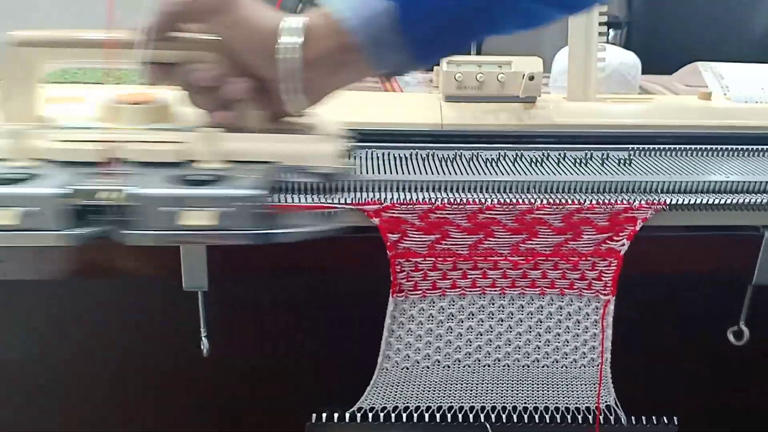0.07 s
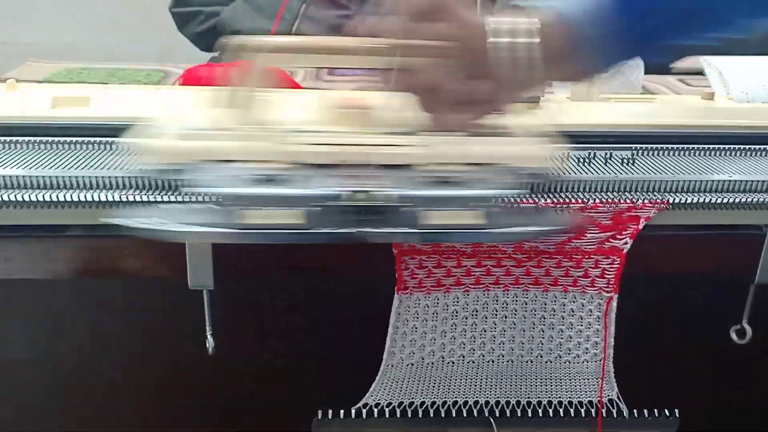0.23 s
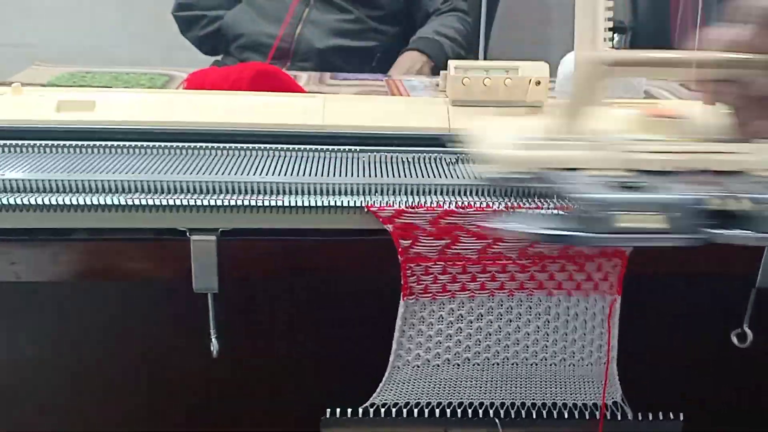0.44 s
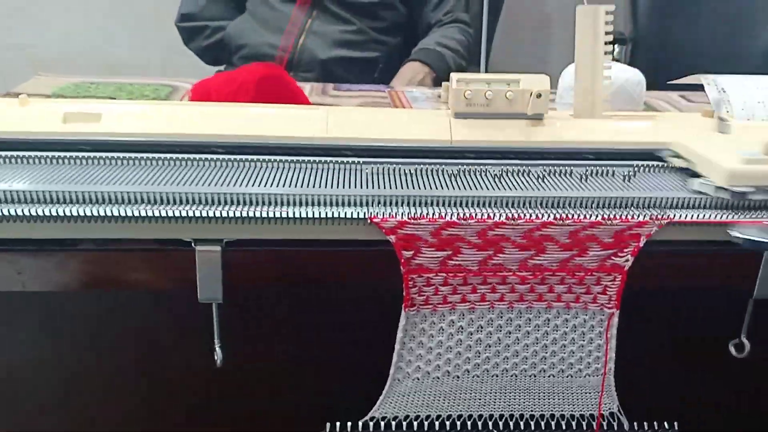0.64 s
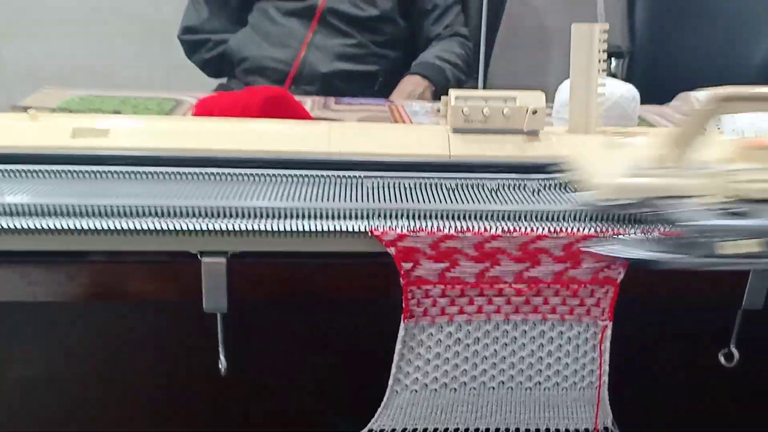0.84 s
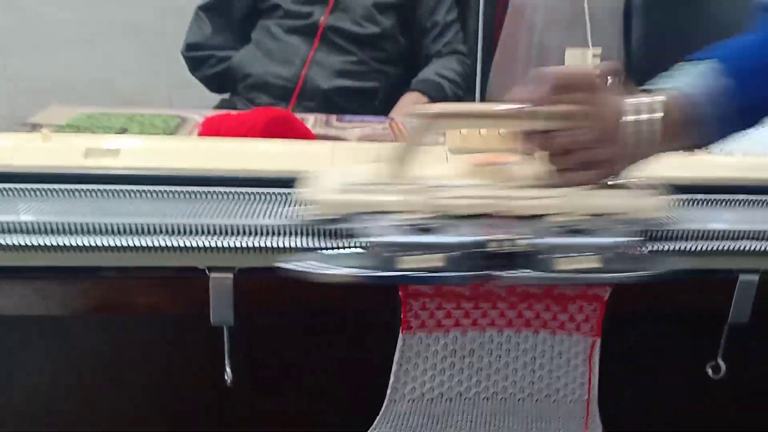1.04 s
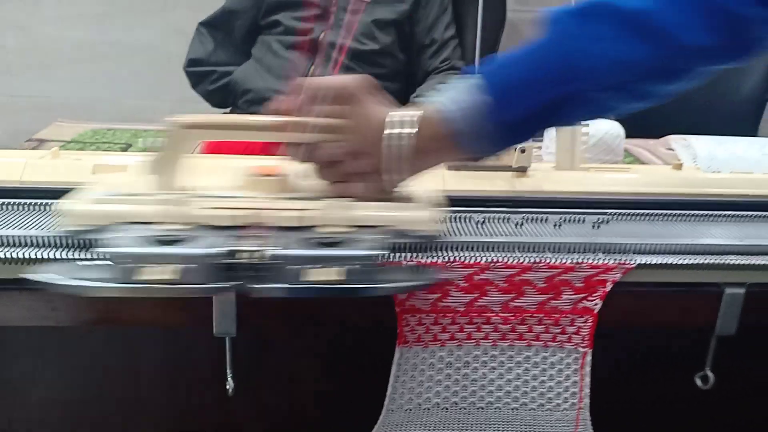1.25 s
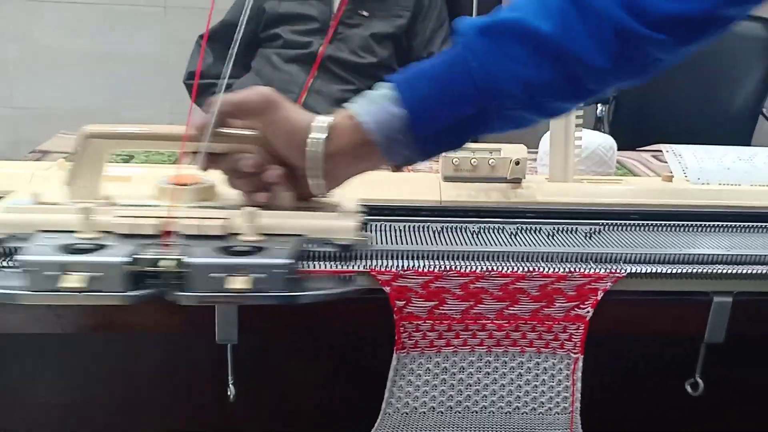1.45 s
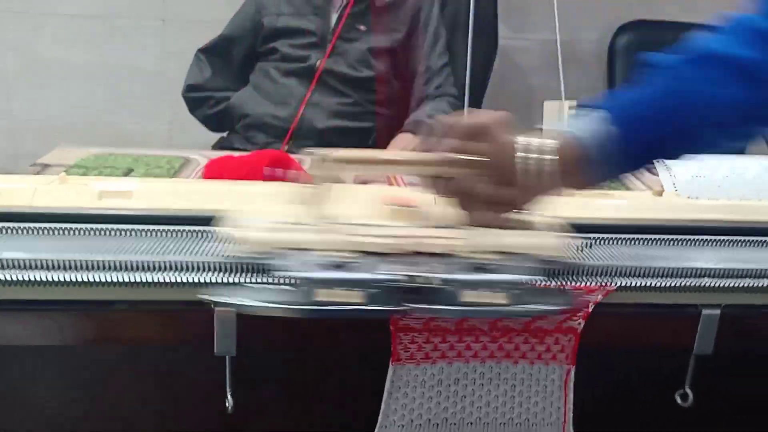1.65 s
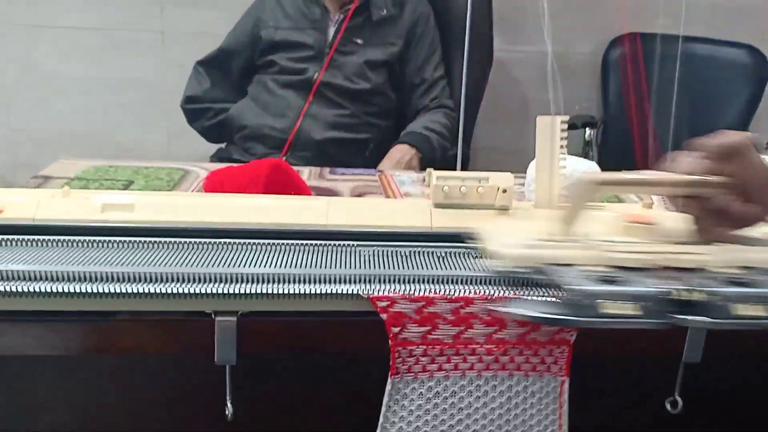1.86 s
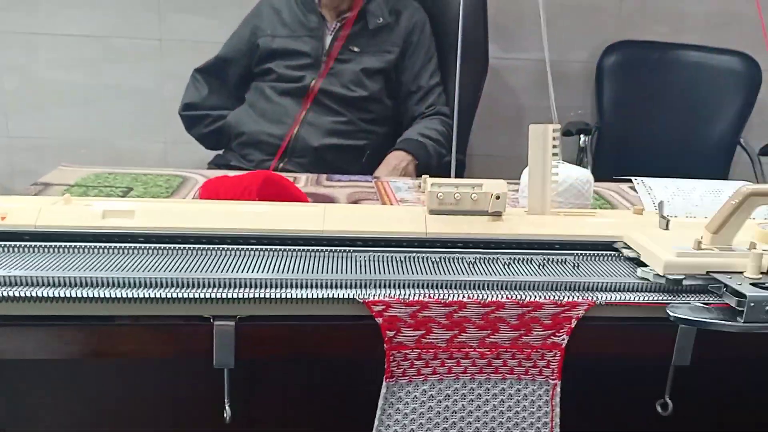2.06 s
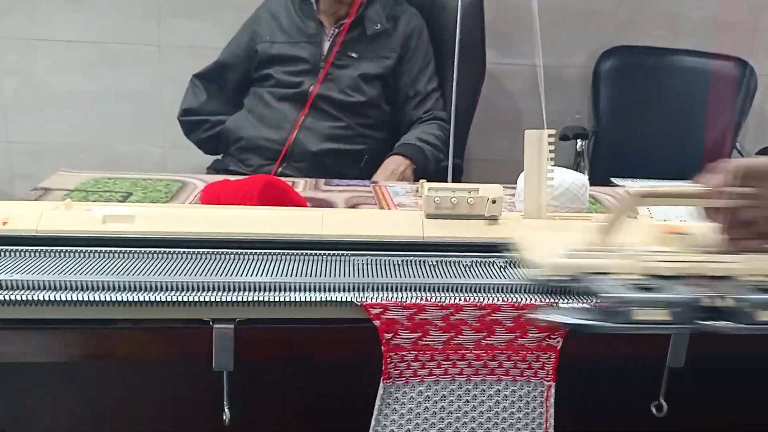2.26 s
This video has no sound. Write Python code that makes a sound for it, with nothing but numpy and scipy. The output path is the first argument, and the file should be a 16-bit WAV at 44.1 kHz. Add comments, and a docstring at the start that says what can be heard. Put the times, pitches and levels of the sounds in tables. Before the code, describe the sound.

Close by in a small room, a hand knitting machine carriage sweeps three times over its needles. Rapid metallic clicks merge into a droning rasp that rises and falls, with scattered knocks and a brief lull at each turn.

```python
"""The carriage of a hand knitting machine is pushed right, left and right again over its steel needle bed.
Its cams strike hundreds of needles a second: a train of impacts that grows denser and brighter with speed.
The impacts force the plastic shell to drone and the long bed to boom under the rasp. The carriage knocks
as it takes up each stroke, and loose steel parts clink. A small hard room with a low rumble surrounds it."""
import sys
import numpy as np
from scipy import signal
from scipy.fft import rfft, irfft, next_fast_len
from scipy.io import wavfile

SR = 44100
rng = np.random.default_rng(int(sys.argv[2]) if len(sys.argv) > 2 else 0)


def store_pcm(level_fs):
    """Save levels as 16-bit WAV."""
    pcm = np.round(np.clip(level_fs, -1, 1) * 32767).astype(np.int16)
    wavfile.write(sys.argv[1], SR, np.atleast_2d(pcm).T)


N = 101429


def undb(db):
    """Amplitude ratio of a level in decibels."""
    return 10 ** (np.asarray(db) / 20)


def unit(x):
    """Normalisation to unit energy in each channel."""
    return x / np.sqrt(np.sum(x ** 2, axis=-1, keepdims=True))


def along(points, hz):
    """Interpolation on a logarithmic frequency axis."""
    freqs, values = np.array(points).T
    return np.interp(np.log(hz + 1), np.log(freqs), values)


def curve(points):
    """Linear interpolation in time."""
    return np.interp(np.arange(N) / SR, *np.array(points).T)


def wander(per_s, count=400):
    """Random modulation with a spread near 1."""
    return np.interp(np.arange(N) / SR * per_s, np.arange(count), rng.standard_normal(count))


def convolve(x, response):
    """Convolution: the output of a linear system with this impulse response."""
    return signal.fftconvolve(np.atleast_2d(x), response, axes=-1)[:, :N]


def colour(points, size=2048):
    """Minimum-phase impulse response of a spectrum, by folding its cepstrum."""
    gain = undb(along(points, np.fft.rfftfreq(size, 1 / SR)))
    cepstrum = irfft(np.log(gain))
    cepstrum[1:size // 2] *= 2
    cepstrum[size // 2 + 1:] = 0
    return unit(irfft(np.exp(rfft(cepstrum)))[None])


def fade(t60, size):
    """Exponential damping: 60 dB in t60 seconds."""
    return np.exp(-np.log(1000) * np.arange(size) / SR / max(t60, 1e-3))


def ring(hz, t60, size=12000):
    """Free vibration of one damped mode."""
    return unit((np.sin(2 * np.pi * hz * np.arange(size) / SR) * fade(t60, size))[None])


# Likeness of the two channels. Each row: frequency in Hz, correlation.
COHERENCE = [(100, 1), (250, 1), (550, 0.85), (1000, 0.082), (2200, 0.089), (4500, 0.1), (14000, 0.018)]
def stereo_noise(size):
    """Spatial coherence: left and right are alike in the bass and nearly unrelated in the treble."""
    mid, side = rfft(rng.standard_normal((2, size)))
    alike = np.clip(along(COHERENCE, np.arange(len(mid)) * SR / size), -.99, .99)
    polarity = np.array([[1], [-1]])
    return irfft(mid * np.sqrt((1 + alike) / 2) + polarity * side * np.sqrt((1 - alike) / 2), size)


ROOM_T60_S, ROOM_DB = 0.25, -3
def contact(body, t60, room_db, size=16384):
    """Impulse response of one contact point: a short dense rattle in the body, then reverberation."""
    direct = unit(stereo_noise(size) * fade(t60, size))
    room = unit(stereo_noise(size) * (fade(ROOM_T60_S, size) - fade(0.0086, size)))
    return unit(convolve(direct + undb(room_db) * room, body))


def blow(body, start_s):
    """Impulse excitation: one hard contact on a body."""
    delay = int(start_s * SR)
    return np.pad(contact(body, t60=0.029, room_db=ROOM_DB), ((0, 0), (delay, N)))[:, :N]


NEEDLES_PER_S, JITTER = 320, .3  # rate at speed 1; timing spread as a share of the needle spacing
SCATTER_DB, SLIDE_DB = 3.5, -4.5
def strikes(speed, scatter_db, count=900):
    """Impact train: a cam edge meets needles at a rate proportional to speed, over sliding noise."""
    rate = NEEDLES_PER_S * speed
    travel = np.cumsum(rate) / SR
    late, strength = rng.standard_normal((count, 2)).T
    onsets = np.searchsorted(travel, np.arange(count) + rng.random() + JITTER * late)
    force = undb(scatter_db * np.clip(strength, -1.7, 1.7))
    force /= np.sqrt(np.mean(force ** 2))
    hits = np.bincount(onsets, force, N + 1)[:N] * (travel > travel[0])
    return hits * np.sqrt(SR / rate) + undb(SLIDE_DB) * rng.standard_normal(N)


def rasp(body, speed, level_db, t60, room_db, scatter_db, cams=6):
    """Incoherent summation: cam edges strike one body at separate points, and their powers add."""
    edges = (convolve(strikes(speed, scatter_db) * undb(level_db), contact(body, t60, room_db))
             for _ in range(cams))
    return sum(edges) / np.sqrt(cams)


CLICK_T60_S, STEEL_DB = 0.011, -18
# Spectrum of a needle click. Each row: frequency in Hz, relative level in dB.
STEEL_SPECTRUM = [(900, -22), (1400, -13), (1850, -3.5), (2250, 2), (2900, 1.5), (3550, -2), (4700, -1.5),
                  (5900, -3), (6500, -9.5), (8000, -20.5), (15500, -34)]
def needles(speed, effort_db):
    """Impact noise: clicks of steel merge into a rasp whose level follows the effort."""
    return rasp(colour(STEEL_SPECTRUM), speed, STEEL_DB + effort_db, CLICK_T60_S, ROOM_DB, SCATTER_DB)


LATCH_DB, LATCH_LAW = -24.5, 1.09  # the law is in dB per dB of effort
# Spectrum of a latch flick. Each row: frequency in Hz, relative level in dB.
LATCH_SPECTRUM = [(4000, -11), (6900, 5.5), (7800, 2), (9800, -1), (11500, 2.5), (12400, 0.5), (13500, 4),
                  (14500, 4), (15500, -2.5)]
def latches(speed, effort_db):
    """Power-law growth: the flicking latches gain faster than the needles, so speed adds brightness."""
    level_db = LATCH_DB + LATCH_LAW * effort_db
    return rasp(colour(LATCH_SPECTRUM), speed, level_db, CLICK_T60_S, room_db=-4, scatter_db=-2.5)


ZING_DB, ZING_LAW, FLICK_DB = -24.5, 1.064, 10.5
# Resonances of a needle. Each row: frequency in Hz, relative level in dB.
NEEDLE_RESONANCES = [(4120, -10.5), (5170, 0.5), (5480, -3)]
# Needles flicked hard. Each row: start in seconds, relative level in dB.
HARD_FLICKS = [(0.301, -2), (.318, -2), (0.382, -16), (0.449, -3.5), (0.893, -14), (0.913, -17), (1.3, -9),
               (1.675, -7), (1.936, -8)]
def zing(speed, effort_db):
    """Natural frequencies: struck needles ring at shared pitches, a few much harder than the rest."""
    out = 0
    for hz, mode_db in NEEDLE_RESONANCES:
        mode = ring(hz, t60=0.0052, size=2048)
        needle = convolve(mode, mode)
        sway_db = 2.5 * wander(per_s=31)  # each pitch comes and goes between groups of needles
        level_db = ZING_DB + ZING_LAW * effort_db + sway_db
        run = rasp(needle, speed, level_db, t60=0.0031, room_db=-11, scatter_db=6, cams=4)
        flicks = sum(undb(FLICK_DB + db) * blow(needle, start) for start, db in HARD_FLICKS)
        out = out + undb(mode_db) * (run + flicks)
    return out


NODES_PER_S, PITCH_DRIFT = 5.97, 0.014
# Modes of the shell. Each row: nominal frequency in Hz, relative level in dB, 60 dB decay in seconds.
SHELL_MODES = [(537, -1, 0.13), (604, -3.5, 0.11), (813, 5, 0.12), (1091.6, -7.5, 0.14), (1322, -9, 0.12),
               (1631, -3, 0.15), (2180, 0.5, .11)]
# Tuning of those modes along the bed. Each row: time in seconds, frequency factor.
SHELL_TUNING = [(.12, .925), (.6, .96), (1.7, 0.98)]
def shell_ring(force, node_db=0):
    """Modal resonance: the hollow shell's modes drift in pitch, and by node_db in level, as it travels."""
    out = 0
    for hz, db, t60 in SHELL_MODES:
        pitch = hz * curve(SHELL_TUNING) * (1 + PITCH_DRIFT * wander(NODES_PER_S))
        phasor = np.exp(2j * np.pi * np.cumsum(pitch) / SR)
        drive = force * undb(db + node_db * wander(NODES_PER_S))
        decay = unit(fade(t60, size=12000)[None])
        out = out + np.real(phasor * convolve(drive / phasor, decay))
    return out * np.sqrt(2 / sum(undb(2 * db) for _, db, _ in SHELL_MODES))


BODY_T60_S, DRONE_REFERENCE_DB = 0.019, -27
SHELL_DB, RING_DB, RING_LAW = -29, -35.5, .75  # the law is in dB of ring per dB of drone
# Broad spectrum of the shell. Each row: frequency in Hz, relative level in dB.
SHELL_SPECTRUM = [(60, -31), (150, -22.5), (280, -5.5), (400, -12), (520, -1), (800, 4), (1100, 0.5),
                  (1400, -5), (2400, -4.5), (5000, -24)]
# Envelope of the drone. Each row: time in seconds, relative level in dB.
DRONE_ENVELOPE = [(0.0, -35), (0.04, -47), (0.32, -22), (0.65, -38), (0.68, -78), (0.77, -49.5),
                  (0.99, -26), (1.32, -32), (1.44, -61), (1.46, -41), (1.54, -41.5), (1.55, -33.5),
                  (1.59, -29), (1.8, -23), (1.9, -31), (2.03, -34.5), (2.15, -51.5), (2.3, -30)]
def shell_drone(speed):
    """Forced vibration: the strikes shake the shell, whose modes stand out more as the drone weakens."""
    level_db = curve(DRONE_ENVELOPE) - DRONE_REFERENCE_DB
    shell = colour(SHELL_SPECTRUM)
    broad = rasp(shell, speed, SHELL_DB + level_db, BODY_T60_S, room_db=-2, scatter_db=SCATTER_DB, cams=8)
    shake = strikes(speed, SCATTER_DB) * undb(RING_DB + RING_LAW * level_db)
    return broad + shell_ring(shake, node_db=1.5)


BED_DB = -39
# Modes of the bed. Each row: frequency in Hz, relative level in dB, 60 dB decay in seconds.
BED_RESONANCES = [(196.8, 0, 0.38), (231, -4, 0.11), (279.6, -1, .12)]
# Envelope of the boom. Each row: time in seconds, relative level in dB.
BOOM_ENVELOPE = [(0, -18), (.17, -5.5), (.5, -4), (.7, -25), (.83, -14), (1.03, 2), (1.26, -4), (1.44, -11),
                 (1.52, -11.5), (1.75, 5), (1.98, -5), (2.1, -14.5), (2.15, -4.5), (2.3, -18)]
def bed_boom(speed):
    """Modal superposition: the strikes excite the low modes of the long bed together."""
    bed = unit(sum(undb(db) * ring(hz, t60) for hz, db, t60 in BED_RESONANCES))
    return rasp(bed, speed, BED_DB + curve(BOOM_ENVELOPE), BODY_T60_S, room_db=-10, scatter_db=2.5)


# Background of the room. Each row: frequency in Hz, relative level in dB.
RUMBLE_SPECTRUM = [(25, -2), (42, -8), (65, -4), (95, 4.5), (130, -3.5), (200, -4), (400, -2.5),
                   (800, -3.5), (1400, -10.5), (3000, -6), (8000, -21.5), (15000, -47)]
def room_rumble(level_db=-41):
    """Stationary noise, filtered so that it is strongest in the bass."""
    return undb(level_db) * convolve(stereo_noise(N), colour(RUMBLE_SPECTRUM))


# Knocks of the carriage. Each row: start in seconds, relative levels of click and of shell ring in dB.
KNOCK_EVENTS = [(.002, -19.5, -25), (.102, -20, -12), (.118, -16, -25), (.151, -12, -16.5),
                (.237, -3.5, -14), (.304, -3, -22), (.448, -15, -12), (.815, -15.5, -31), (.860, -28, -19),
                (.892, -17, -27), (.917, -12.5, -13.5), (1.312, -14, -14), (1.531, -19, -29),
                (1.549, -13, -13.5), (1.670, -1.5, -11.5), (1.711, -13, -8), (2.240, -17.5, -25),
                (2.277, -18, -18.5)]
def knocks(click_db=9, ring_db=10):
    """Transients: as the carriage tips or a cam meets its first needles, steel clicks and the shell rings."""
    steel = colour(STEEL_SPECTRUM)
    clicks = sum(undb(click_db + db) * blow(steel, start) for start, db, _ in KNOCK_EVENTS)
    pushes = sum(undb(ring_db + db) * (np.arange(N) == int(start * SR)) for start, _, db in KNOCK_EVENTS)
    return clicks + shell_ring(pushes)


# Loose steel parts. Each row: start in seconds, frequency in Hz, level in dB, 60 dB decay in seconds.
LOOSE_PARTS = [(.018, 2400, -39, 0.077), (0.699, 3100, -46, 0.64), (.957, 2400, -27, 0.085),
               (1.608, 2166, -25, 0.095), (2.08, 2400, -53, .9)]
def pings():
    """Damped free vibration: loose parts clink under way and ring on faintly as the carriage turns."""
    out = 0
    for start, hz, db, t60 in LOOSE_PARTS:
        age = np.maximum(np.arange(N) / SR - start, 0)
        out = out + undb(db - 60 * age / t60) * np.sin(2 * np.pi * hz * age)
    return out


EFFORT_REFERENCE_DB, DB_PER_SPEED_DECADE, SHUDDER_DB = -17, 38, 1.66
# Effort on the needles in each stroke. Each row: time in seconds, relative level in dB.
FIRST_RIGHT = [(0.0, -37), (0.094, -57), (0.102, -38), (0.148, -31), (0.194, -32), (0.316, -16),
               (0.442, -20), (0.598, -30.5), (0.678, -42), (0.704, -56), (0.76, -57)]
BACK_LEFT = [(0.78, -46.5), (0.788, -38.5), (0.806, -57), (0.816, -35), (0.888, -39), (0.89, -34),
             (0.976, -20.5), (1.14, -19.5), (1.31, -26.5), (1.402, -40.5), (1.45, -57.5)]
SECOND_RIGHT = [(1.47, -46.5), (1.524, -54), (1.532, -39.5), (1.554, -27), (1.575, -32.5), (1.7, -16.5),
                (1.872, -18.5), (1.886, -25), (1.944, -25), (2.08, -39.5), (2.13, -57), (2.16, -56),
                (2.204, -38.5), (2.228, -47), (2.24, -37.5), (2.3, -34)]
def scene():
    """Superposition: the hand's effort sets the rate of impacts; rumble, knocks and pings add to them."""
    effort_db = curve(np.vstack([FIRST_RIGHT, BACK_LEFT, SECOND_RIGHT])) - EFFORT_REFERENCE_DB
    speed = 10 ** (effort_db / DB_PER_SPEED_DECADE)
    effort_db = effort_db + SHUDDER_DB * wander(per_s=45)  # the carriage runs unevenly
    steel = needles(speed, effort_db) + latches(speed, effort_db) + zing(speed, effort_db)
    return steel + shell_drone(speed) + bed_boom(speed) + room_rumble() + knocks() + pings()


# Balance of the microphones. Each row: frequency in Hz, left level minus right level in dB.
CHANNEL_BALANCE = [(100, 1.5), (500, .8), (2300, 0.5), (4000, 5), (5200, 2), (6500, 4.5), (9500, 7),
                   (13400, 6.5), (15200, -3)]
def record(dry, low_cut_hz=58, top_hz=15650):
    """Band limiting and soft saturation, after a level difference that gives the left more treble."""
    size = next_fast_len(N + 4096)
    lean_db = along(CHANNEL_BALANCE, np.fft.rfftfreq(size, 1 / SR))
    gains = undb(np.array([lean_db, -lean_db]) / 2)
    heard = irfft(rfft(dry, size) * gains, size)[:, :N]
    heard = signal.sosfilt(signal.butter(4, low_cut_hz, "high", fs=SR, output="sos"), heard)
    heard = heard / (1 + (heard / .9) ** 6) ** (1 / 6)  # rounds the loudest peaks
    return signal.sosfiltfilt(signal.ellip(10, .1, 50, top_hz, fs=SR, output="sos"), heard)


dry = scene()
out = record(dry)
store_pcm(out)
```